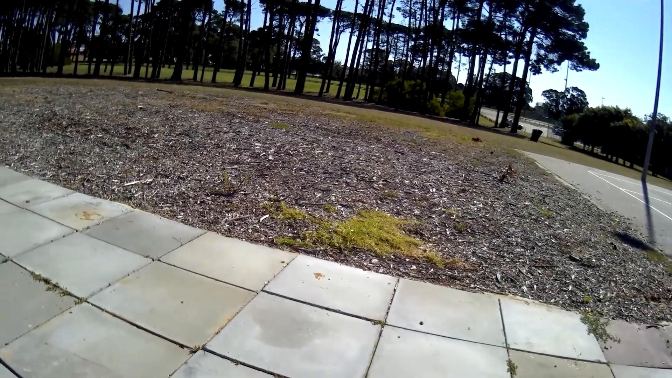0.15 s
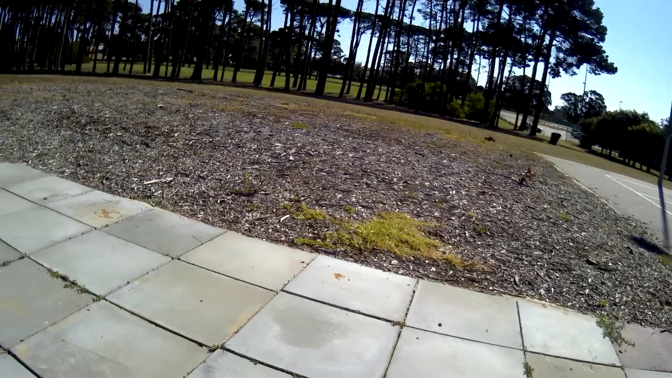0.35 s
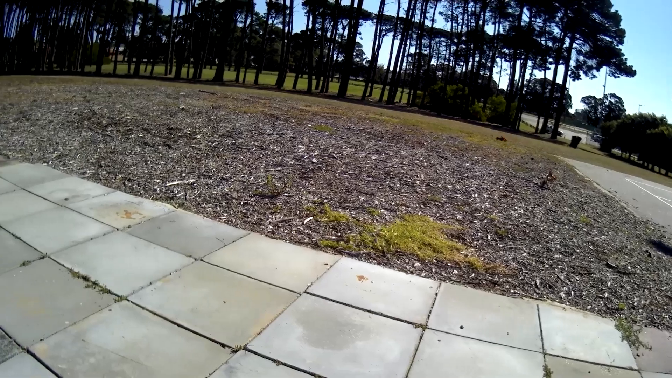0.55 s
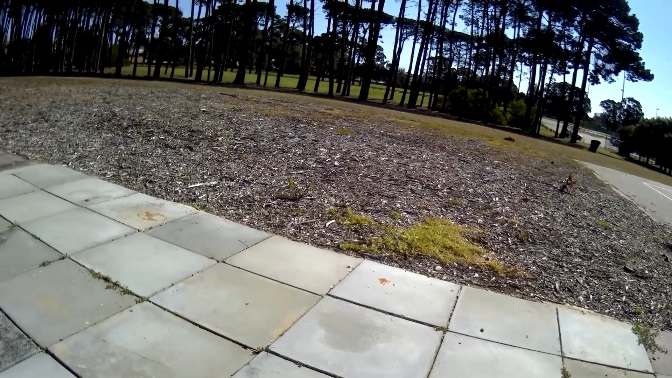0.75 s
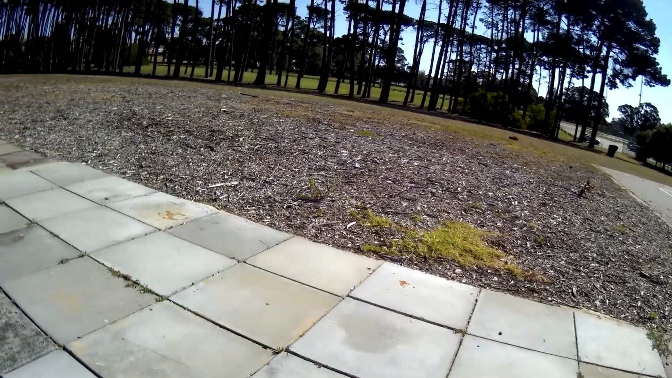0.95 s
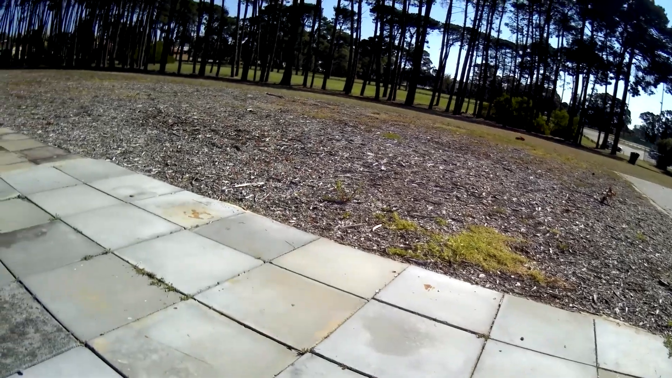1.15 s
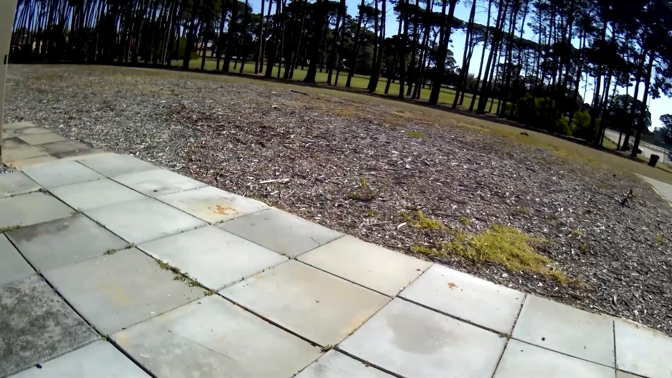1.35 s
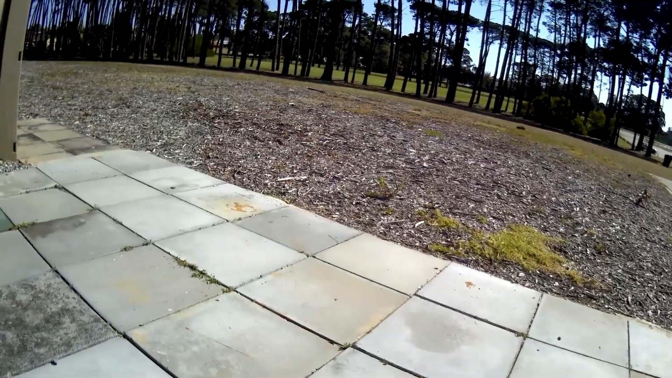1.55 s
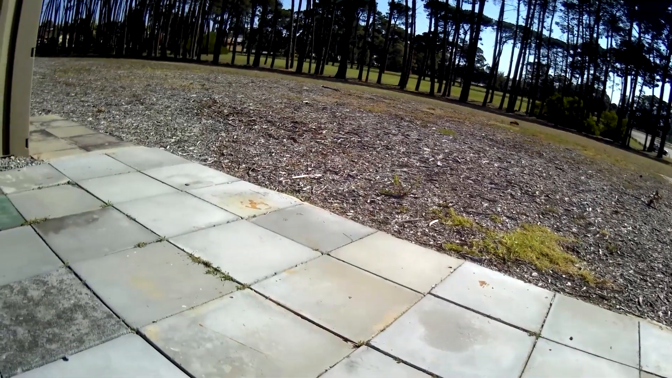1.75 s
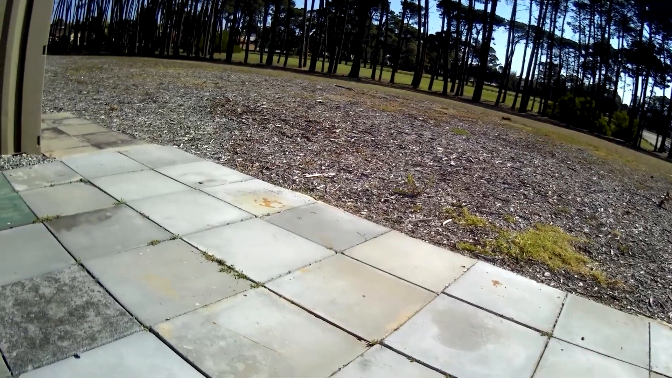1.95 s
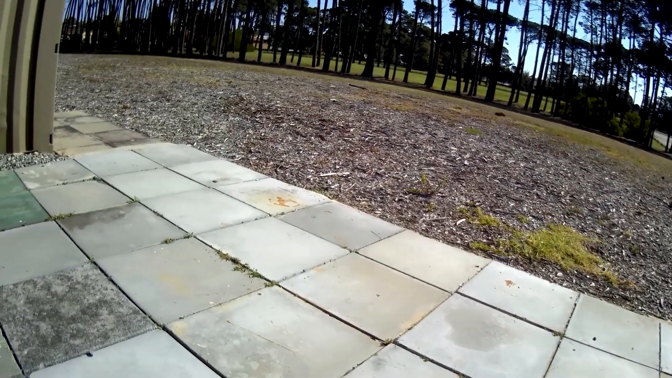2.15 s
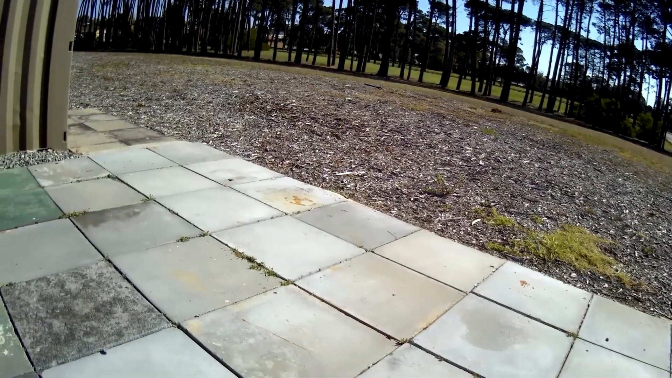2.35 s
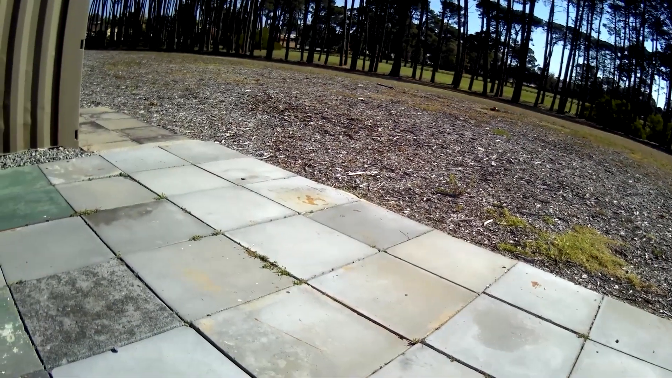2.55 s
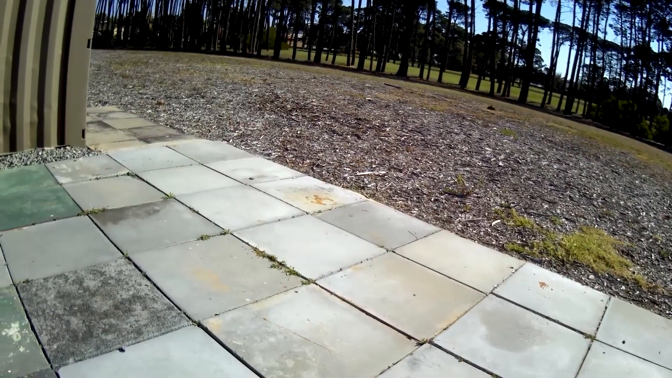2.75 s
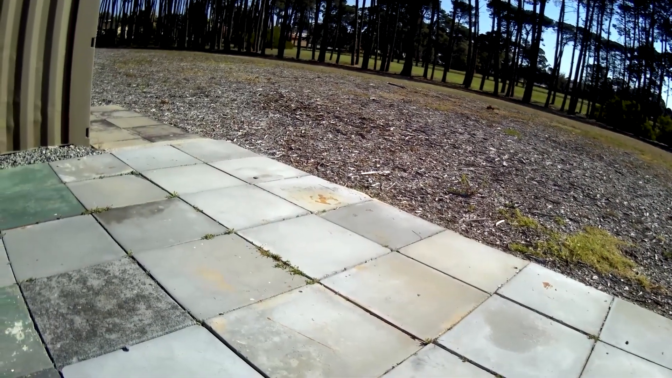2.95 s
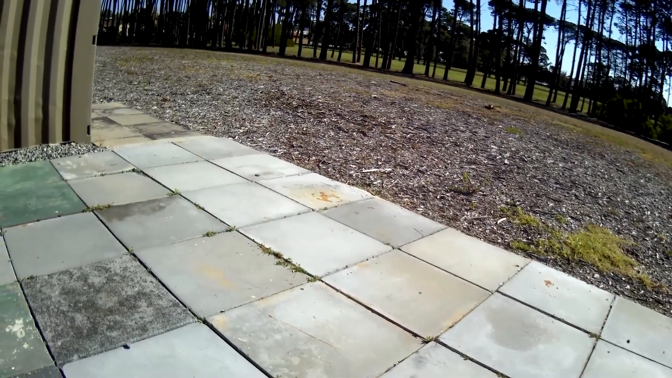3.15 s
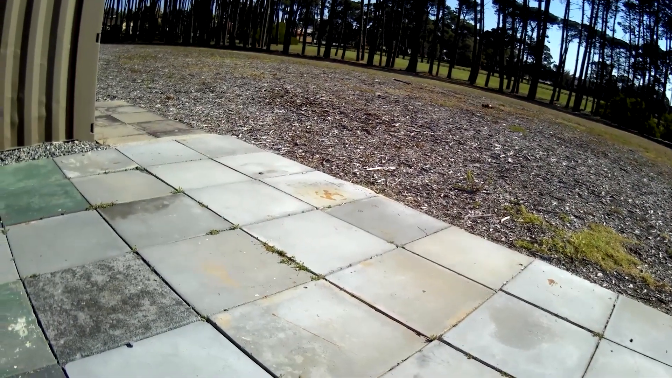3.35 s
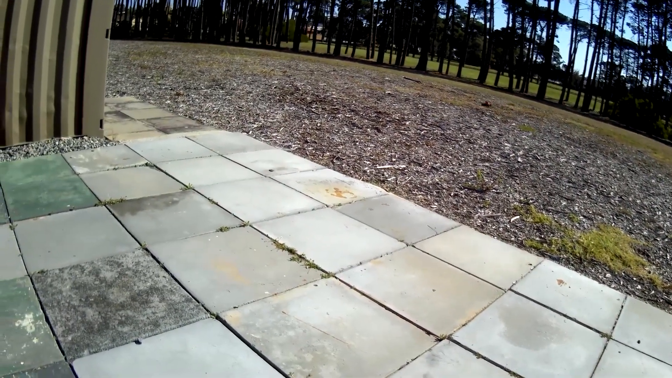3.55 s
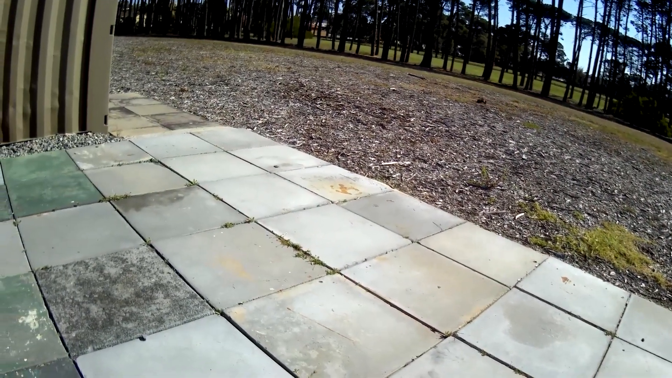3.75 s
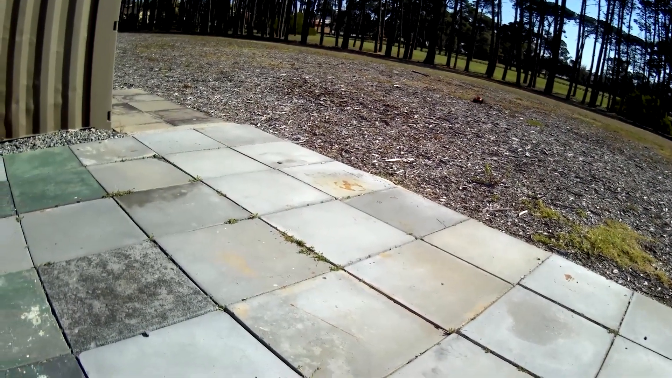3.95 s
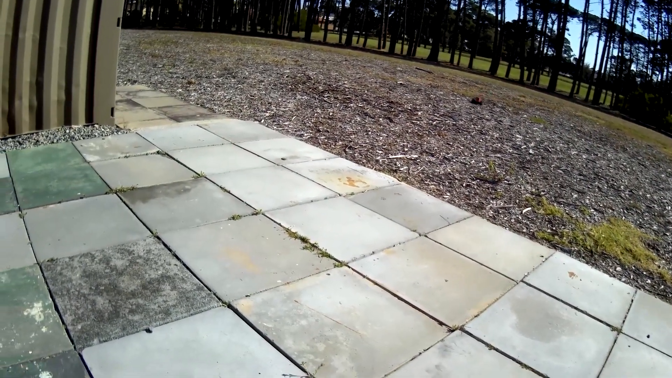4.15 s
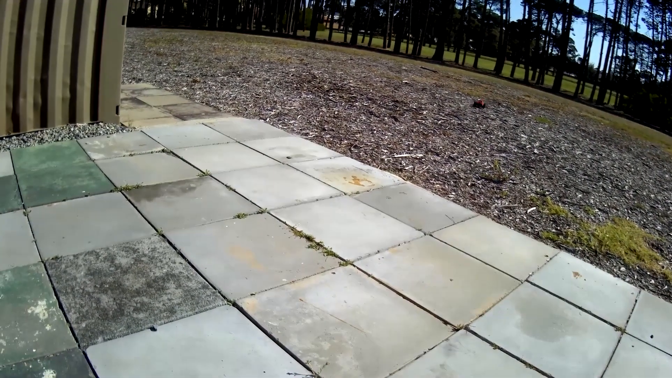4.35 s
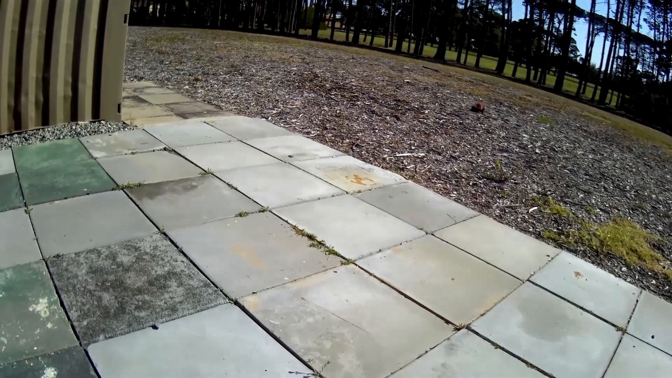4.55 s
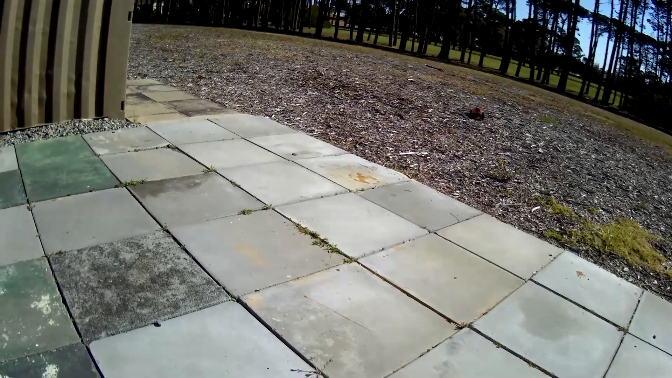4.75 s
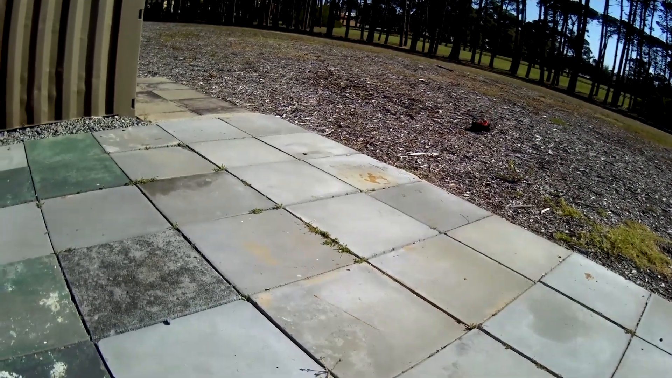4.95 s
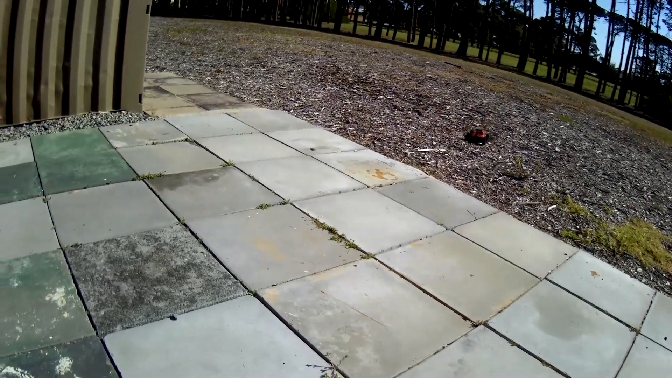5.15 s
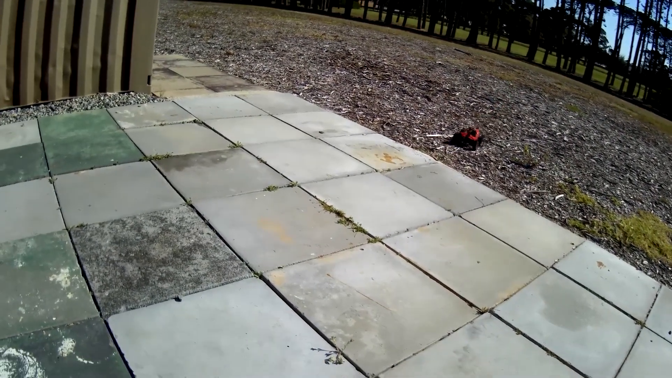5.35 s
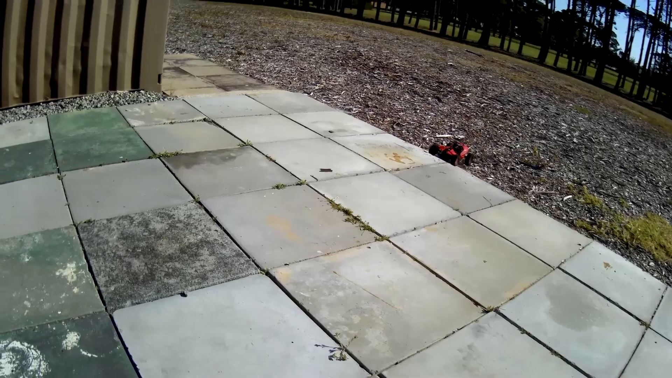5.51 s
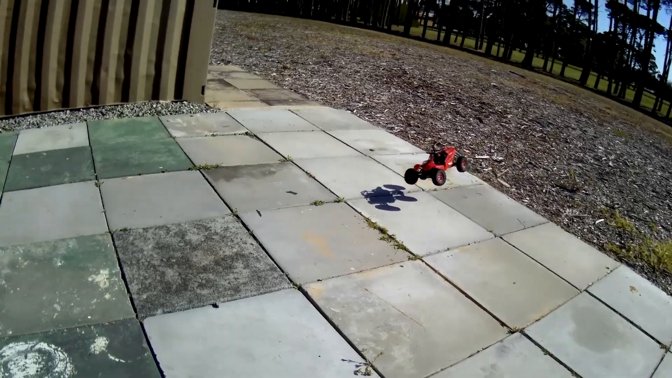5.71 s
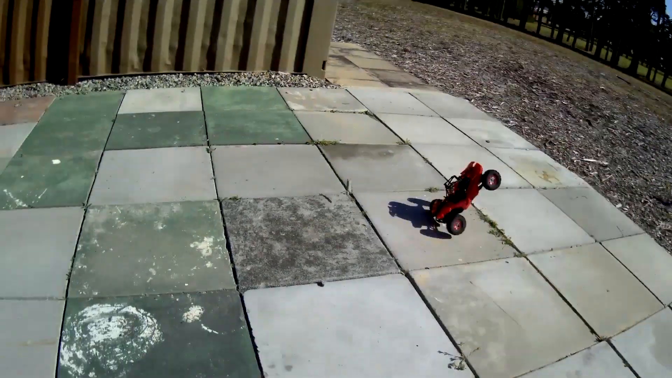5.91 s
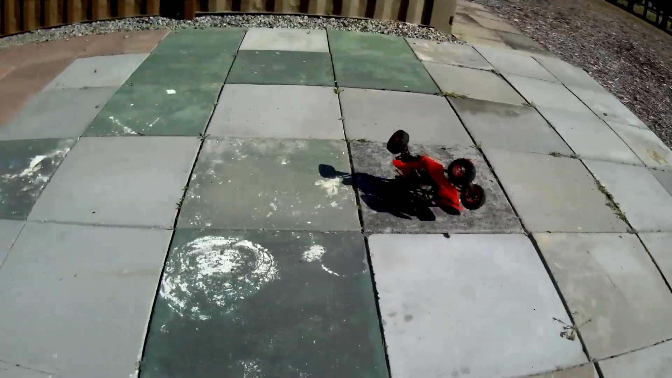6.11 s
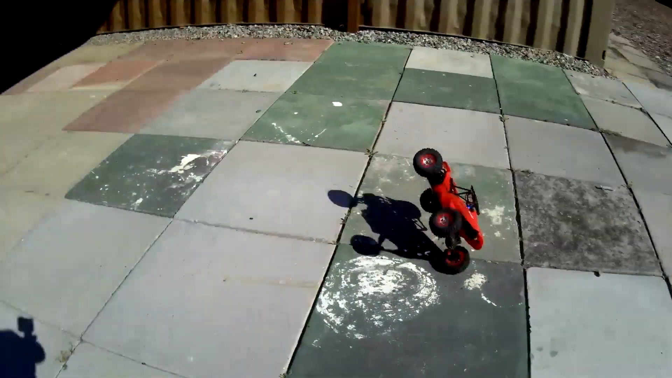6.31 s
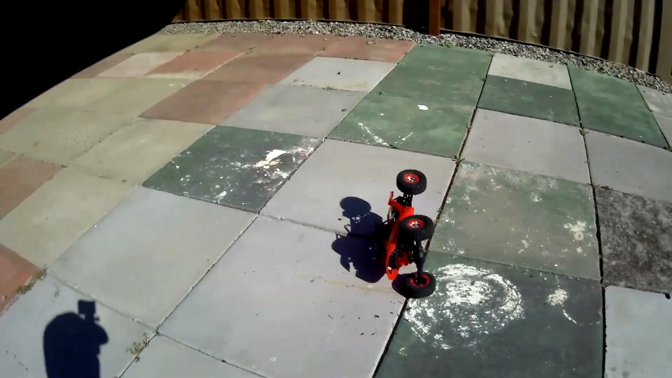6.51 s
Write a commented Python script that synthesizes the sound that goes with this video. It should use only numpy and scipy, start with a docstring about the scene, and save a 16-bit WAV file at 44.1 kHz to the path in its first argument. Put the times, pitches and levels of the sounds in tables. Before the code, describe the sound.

Outdoors, low wind rumbles on the microphone throughout, over a soft hiss of trees and road and a distant engine drone that slowly rises. From about 0.3 seconds, a small remote-control truck's electric motor gives short, faint bursts of high, raspy whine. At about 3.3 seconds it holds full throttle, wavering and growing louder as it approaches, with plastic gears chattering. From around 4 seconds its tyres crunch over wood chips, with a few small knocks. At 5.5 seconds it hits paving slabs with clacks, scuffs and tiny squeaks. Near 5.9 seconds it brakes, the whine falling quickly, and the loudest cluster of sharp plastic knocks comes close by at about 6.1 seconds. The truck tumbles on with rattles, gritty scrapes and lighter thuds until about 6.7 seconds. The whole sound is narrow and dull, with little treble.

```python
"""A raspy whine comes in bursts, then runs on and nears: a small radio-controlled truck races over wood
chips, hops onto paving, lands, brakes and tumbles. Meshing gear teeth make the whine and ring the gearbox;
the tyres crunch in countless tiny impacts, and blows on the slabs excite the modes of the plastic shell.
Behind it wind rumbles on the microphone, trees and a road hiss, and an engine drones far away.
The camera's low sampling rate makes everything narrow and dull."""
import sys
import numpy as np
from scipy import signal
from scipy.fft import rfft, irfft, next_fast_len
from scipy.io import wavfile

SR = 44100
rng = np.random.default_rng(int(sys.argv[2]) if len(sys.argv) > 2 else 0)


def wrap_up_sound(samples):
    """Save the sound to the file named by the first command line argument, as 16-bit audio."""
    columns = np.atleast_2d(samples).T
    # keep every value between -1 and 1, then stretch to whole-number steps
    tamed = np.clip(columns, -1, 1)
    steps = np.round(tamed * 32767).astype(np.int16)
    wavfile.write(sys.argv[1], SR, steps)


N = 294271
TIME = np.arange(N) / SR
TICKS = np.arange(0, N / SR, .001)  # control times, one per millisecond


def motor():
    """Gear-mesh noise: a tone at the tooth rate in a band of chatter, modulated as the wheels skip."""
    # band that the motor can radiates: frequency_hz, gain_db
    can_response = [(2700, -15.5), (2950, 2.5), (3200, -3), (3450, -7.5), (3720, 0), (3950, -11.5)]
    teeth_per_turn, skip_hz = 48, 47.4
    mesh_hz, gain = throttle()
    skip = np.clip(wander(skip_hz), -1, 2)  # an unloaded wheel raises both pitch and level
    hz = mesh_hz * (1 + 0.018 * skip)
    tone = whine(hz, jitter=.016, jitter_hz=170, flutter_db=2)
    rasp = grit(per_s=380, spread_db=0.5, hiss=0.36)
    for _ in range(3):  # cascaded for steep skirts
        rasp = moving_resonance(rasp, hz, width_hz=750)
    buzz = unit(rasp) + 1.05 * tone
    shaft_turns = np.cumsum(hz * (1 + 0.13 * wander(30))) / SR / teeth_per_turn
    throb = (1 + 0.2 * np.sin(2 * np.pi * shaft_turns)) * amp(2.5 * skip)
    return amp(1.5) * gain * unit(colour(throb * buzz, can_response))


def throttle():
    """Mesh pitch and gain follow drive and load: each squeeze spins the motor up; deep chips slow it."""
    # short squeezes of the throttle: start_s, end_s, top_pitch_hz, level_db
    squeezes = [(0.297, 0.485, 4020, -25), (0.562, 0.67, 3930, -32), (1.082, 1.3, 3010, -35),
                (1.281, 1.598, 3330, -36.5), (1.703, 1.796, 3130, -34), (1.896, 2.004, 3166, -30.5),
                (2.098, 2.234, 3076, -34), (2.423, 2.535, 3214, -30.5), (2.582, 2.877, 3415, -33),
                (3.071, 3.128, 2900, -32), (3.148, 3.237, 3250, -38), (3.256, 3.332, 3210, -31.5),
                (5.702, 5.776, 3537, -36.5), (5.889, 6.102, 3510, -35.5)]
    # long run at full throttle: time_s, pitch_hz, level_db
    full_run = [(3.33, 3126, -29.5), (3.38, 3330, -23.5), (3.44, 3217, -26), (3.52, 3490, -21.5),
                (3.58, 3356, -22.5), (3.71, 3394, -26.5), (3.78, 3376, -24.5), (3.86, 3425, -28.5),
                (3.98, 3405, -25.5), (4.07, 3520, -24), (4.12, 3382, -22.5), (4.201, 3436, -31),
                (4.309, 3396, -23.5), (4.38, 3477, -25.5), (4.449, 3499, -24), (4.53, 3534, -31.5),
                (4.611, 3540, -26.5), (4.712, 3443, -23.5), (4.92, 3595, -27), (5.009, 3162, -24),
                (5.06, 3463, -26.5), (5.15, 3573, -22), (5.2, 3377, -24.5), (5.301, 3505, -22),
                (5.44, 3526, -26), (5.48, 3298, -28), (5.57, 3324, -25.5), (5.61, 3550, -37),
                (5.67, 3536, -26.5)]
    attack_s, release_s = 0.027, .025
    sag, spin_up_s = 0.047, 0.25  # the pitch starts low by this share and catches up
    hz, gain = np.full(len(TICKS), float(squeezes[0][2])), 0
    for start_s, end_s, top_hz, db in squeezes:
        on = TICKS >= start_s
        hz[on] = top_hz * (1 - sag * np.exp((start_s - TICKS[on]) / spin_up_s))
        gain = np.maximum(gain, amp(db) * envelope(start_s, end_s, attack_s, release_s))
    run_s, run_hz, run_db = np.transpose(full_run)
    run_gain = amp(np.interp(TICKS, run_s, run_db)) * envelope(run_s[0], run_s[-1], attack_s, release_s)
    hz = np.where(run_gain > gain, np.interp(TICKS, run_s, run_hz), hz)
    return per_sample(hz), per_sample(np.maximum(gain, run_gain) * nearness())


def braking():
    """Mesh pitch is proportional to speed: the tone falls ever faster, loudest as the truck lands."""
    start_s, peak_s, end_s = 5.86, 6.105, 6.25
    from_hz, to_hz, fade_db_per_s = 2300, 694, 51
    progress = np.clip((TIME - start_s) / (end_s - start_s), 0, 1)
    hz = from_hz + (to_hz - from_hz) * progress ** 1.8
    gain = amp(-27.5 - fade_db_per_s * abs(TICKS - peak_s))
    gain *= envelope(start_s, end_s, attack_s=0.018, release_s=0.0055)
    return per_sample(gain) * whine(hz, jitter=.075, jitter_hz=300, flutter_db=4)


def gears(rattle):
    """Forced resonance: teeth ring the plastic gearbox under drive and at jolts; mesh tones sing through."""
    # spectrum of the tooth chatter: frequency_hz, gain_db
    chatter_spectrum = [(300, -22.5), (700, -6), (1100, -4.5), (1350, -1), (1600, 1.5), (1850, -2.5),
                        (2300, -7), (2750, -14.5), (3300, -25.5), (3900, -49.5)]
    # gearbox resonances: pitch_hz, width_hz, gain_db
    housing_modes = [(820, 28, -14.5), (990, 17, -9), (1410, 90, -1), (1486, 130, 6.5), (1660, 83, -1.5),
                     (2090, 130, -11.5)]
    # mesh tones of the slower stages, relative to the chatter: pitch_hz, level_db
    stage_tones = [(1285, -15), (1565, -13.5), (1725, -16)]
    teeth = grit(per_s=2500, spread_db=4.0, hiss=.8)
    ring = sum(amp(db) * resonance(teeth, hz, width_hz) for hz, width_hz, db in housing_modes)
    chatter = unit(unit(colour(teeth, chatter_spectrum)) + 0.14 * unit(ring)) * amp(1.3 * wander(30))
    tones = np.zeros(N)
    for hz, db in stage_tones:
        gain = amp(db + 1.4 * wander(4.5))
        drifting_hz = hz * (1 + 0.01 * wander(3.2))
        tones += gain * whine(drifting_hz, jitter=.007, jitter_hz=59.3, flutter_db=3.0)
    driven = amp(-24.5) * envelope(start_s=3.21, end_s=5.96, attack_s=0.25, release_s=0.25)
    coasting = amp(-42.5)
    running = per_sample(nearness() * np.maximum(driven, coasting))
    return np.hypot(running, rattle) * chatter + running * tones


def knocks():
    """Impact excitation: plastic cracks on stone, the shell's modes ring and the suspension thuds."""
    # blows of wheels and shell: start_s, peak_db, thud_weight_db
    blows = [(0.5434, -29, 4), (4.825, -29, -8), (5.202, -24, 7), (5.503, -21, -5), (5.549, -17, -5),
             (5.607, -23, -3), (5.628, -26, 11), (5.88, -22, 2), (5.903, -20.5, 0), (5.939, -17.5, -16.5),
             (5.952, -31, -6.5), (6.063, -11, -15), (6.067, -8, 0.5), (6.071, -8.5, 9), (6.089, -16, -15),
             (6.1, -16, -7), (6.133, -16, -12), (6.145, -16.5, -14), (6.185, -14.5, -14), (6.196, -16, -5),
             (6.210, -15.5, -0.5), (6.228, -22, -5.5), (6.233, -25, -3), (6.289, -19, 14), (6.3, -19, 2),
             (6.343, -28, -6), (6.355, -31, -7), (6.472, -20, 6), (6.497, -21.5, 21), (6.564, -27.5, -5),
             (6.635, -25, 0), (6.6407, -19.5, -2)]
    # shell modes, raised by up to 5 % at each blow: pitch_hz, level_db, t60_s
    shell_modes = [(466, -19.5, 0.041), (726, -3.5, 0.019), (940, 3, 0.035), (1417, 3.5, 0.019),
                   (1563, 4, 0.021), (1732, 0.5, 0.031), (1900, -11, 0.026), (2510, -8.5, 0.011)]
    crack_t60_s, thud_t60_s, thud_hz = 0.014, 0.022, 288
    out, t = np.zeros(N), np.arange(SR // 6) / SR
    onset = 1 - np.exp(-t / .0003)  # the tyres soften each blow
    for start_s, peak_db, thud_db in blows:
        ring = np.zeros(len(t))
        for hz, db, t60_s in shell_modes:
            cycles = hz * rng.uniform(1.0, 1.05) * t + rng.random()
            ring += amp(db - 60 * t / t60_s) * np.sin(2 * np.pi * cycles)
        burst = unit(resonance(rng.standard_normal(len(t)), hz=1880, width_hz=640))
        crack = amp(-17 - 60 * t / crack_t60_s) * burst
        thud = amp(-60 * t / thud_t60_s) * np.sin(2 * np.pi * thud_hz * rng.uniform(0.84, 1.35) * t)
        blow = (ring / abs(ring).max() + crack + amp(thud_db - 6.5) * thud) * onset
        add(out, start_s, amp(peak_db) * blow / abs(blow).max())
    return out


def wood_chips():
    """Granular noise: tiny impacts under the tyres merge into a crunch that swells at each heap."""
    # spectrum of the crunch: frequency_hz, gain_db
    chip_spectrum = [(60, -15.5), (150, -0.5), (300, -2.5), (420, -4), (600, -11.5), (1000, -16),
                     (1600, -13.5), (3000, -25.5)]
    # heaps that the tyres plough into: peak_s, level_db
    heaps = [(4.105, -45.5), (4.244, -42), (4.382, -41.5), (4.572, -41), (4.818, -43), (4.994, -33.5),
             (5.108, -36), (5.27, -42.5), (5.345, -40), (5.41, -33), (5.48, -32.5)]
    rolling = nearness() * envelope(start_s=3.64, end_s=5.55, attack_s=1, release_s=0.047)
    lumps = amp(-22.5 + 0.5 * wander(14))
    ploughing = sum(amp(db) * swell(s, attack_s=0.026, release_s=0.019) for s, db in heaps)
    crunch = unit(colour(grit(per_s=350, spread_db=4.5, hiss=0.99), chip_spectrum))
    return np.hypot(per_sample(rolling) * lumps, per_sample(ploughing)) * crunch


def paving(scuffing, scraping):
    """Sliding friction: rubber scuffs low on the slabs and sand scrapes high."""
    # spectrum of rubber on stone: frequency_hz, gain_db
    rubber_spectrum = [(100, 2.5), (280, -5), (450, 0.5), (620, 1.5), (900, 3), (1200, 0), (2000, -15.5),
                       (2600, -25.5), (3900, -11.5)]
    # spectrum of sand on stone: frequency_hz, gain_db
    sand_spectrum = [(800, -17.5), (2000, -6.5), (2600, 7), (3100, 7.5), (3900, 8)]
    scuff = unit(colour(grit(per_s=1100, spread_db=4.5, hiss=0.42), rubber_spectrum))
    scrape = unit(colour(grit(per_s=670, spread_db=-2.5, hiss=0.16), sand_spectrum))
    return scuffing * scuff + scraping * scrape


def contacts():
    """Incoherent sounds add in power: the gains of scuff, scrape and gear rattle over all touchdowns."""
    # wheels and shell meeting the slabs: peak_s, release_s, scuff_db, scrape_db, rattle_db
    touchdowns = [(5.48, 0.047, -37, -50.5, -34), (5.546, 0.034, -28, -48, -36),
                  (5.607, 0.014, -23.5, -20.5, -36), (5.689, 0.044, -63, -26.5, -60),
                  (5.912, .03, -29.5, -22, -37), (5.949, 0.022, -21.5, -17, -30.5),
                  (6.001, 0.028, -31, -40, -29), (6.035, .02, -36, -30, -39),
                  (6.066, 0.018, -21.5, -25, -36.5), (6.098, 0.018, -38, -17, -20.5),
                  (6.141, 0.017, -34, -36, -20.5), (6.185, 0.013, -35, -47, -25),
                  (6.211, 0.027, -23, -28, -24), (6.292, 0.047, -44, -64, -34.5),
                  (6.492, 0.14, -39, -56, -39.5), (6.64, 0.15, -31, -41, -34)]
    power = sum((amp(levels_db)[:, None] * swell(s, attack_s=0.016, release_s=release_s)) ** 2
                for s, release_s, *levels_db in touchdowns)
    return [per_sample(gain) for gain in np.sqrt(power)]


def chirps():
    """Short tones under bell-shaped envelopes: the whine flicks upward as the wheels skip, gears and rubber
    squeak, and the shell rings at the hardest blow."""
    # short tones: peak_s, pitch_hz, peak_db, half_length_s, glide_hz_per_s
    chirp_rows = [(0.617, 3680, -53.5, 0.0061, 2), (3.778, 3410, -47, 0.016, -1), (3.82, 3610, -45, 0.0046, 0),
                  (3.942, 3610, -45, 0.004, -6), (4.222, 3730, -50, 0.014, 0), (4.243, 3600, -47, 0.0031, 4),
                  (4.307, 3420, -44.5, 0.03, 0), (4.445, 3562, -41, 0.0068, 0), (4.486, 3614, -36, 0.0037, 0),
                  (4.557, 3750, -39, 0.0032, 1), (4.603, 3580, -40, 0.0048, 0), (4.697, 3464, -36.5, 0.008, 3),
                  (5.046, 3574, -33, 0.004, -5), (5.384, 1308, -34, 0.022, 0), (5.544, 1599, -30.5, 0.033, -700),
                  (5.55, 3290, -24.5, 0.006, 1), (5.641, 3590, -20.5, 0.0037, -0.5),
                  (5.908, 3820, -27.5, 0.0046, 0), (6.041, 1870, -15.5, 0.0038, 2),
                  (6.041, 3780, -25.5, 0.0034, 1), (6.0882, 1597, -4, 0.003, 1.5), (6.15, 1430, -21, 0.0052, 1),
                  (6.212, 838, -19.5, .005, 3)]
    out, t = np.zeros(N), np.arange(-SR // 4, SR // 4) / SR
    for peak_s, hz, db, half_length_s, glide in chirp_rows:
        tone = np.sin(2 * np.pi * (hz + glide * t / 2) * t)
        add(out, peak_s + t[0], amp(db) * np.exp(-(t / half_length_s) ** 2) * tone)
    return out


def nearness():
    """Spreading loss low over the ground: gain, relative to 1 m, of a steady approach that ends close by."""
    speed_m_per_s, arrival_s, nearest_m, loss_db_per_doubling = 5.28, 5.952, 1.85, 8
    distance_m = np.hypot(nearest_m, speed_m_per_s * np.maximum(arrival_s - TICKS, 0))
    return amp(-loss_db_per_doubling * np.log2(distance_m))


def wind():
    """Turbulent pressure on the microphone: a low rumble with gusts and single buffets."""
    # strength of the wind: time_s, level_db
    strength = [(0.0, -34.5), (0.8, -34), (1.35, -38), (1.82, -35), (3.0, -37), (3.84, -38.5),
                (4.27, -33.5), (5.07, -31.5), (5.33, -27), (5.54, -23), (5.7, -41.5), (5.78, -27.5),
                (6.06, -25), (6.67, -32.5)]
    # single buffets: peak_s, level_db
    buffets = [(0.449, -32.5), (2.6, -30.5), (4.21, -25), (4.36, -30.5), (4.7, -25.5), (5.281, -20.5),
               (5.93, -20)]
    # spectrum of the rumble: frequency_hz, gain_db
    rumble_spectrum = [(10, -9), (25, 1.5), (50, 2), (75, -4.5), (110, -7.5), (170, -19), (280, -32),
                       (600, -64)]
    buffeting = sum(amp(db) * swell(s, attack_s=0.031, release_s=0.054) for s, db in buffets)
    gusts = amp(track(strength) - 0.3 + 0.5 * wander(4.1))
    rumble = unit(colour(rng.standard_normal(N), rumble_spectrum))
    return np.hypot(gusts, per_sample(buffeting)) * rumble


def trees_and_road():
    """Many distant, incoherent sources merge into a nearly steady wash of noise."""
    # spectrum of the wash: frequency_hz, gain_db
    wash_spectrum = [(100, -11), (220, 3.5), (320, -2.5), (500, 1), (700, -0.5), (900, 0.5), (1200, -4),
                     (1600, -4.5), (2000, -12), (2400, -16.5), (3000, -19.5), (3900, -23)]
    return amp(-46.5) * unit(colour(rng.standard_normal(N), wash_spectrum)) * amp(0.5 * wander(4.1))


def far_engine():
    """Periodic firing gives a harmonic drone, which rises as the engine slowly gains speed."""
    # course of the engine: time_s, firing_hz, fundamental_db, overtones_db
    course = [(0, 54, -52, -48.5), (.5, 57, -44.5, -44.5), (1.3, 60.5, -45.5, -46), (2.1, 64, -35.5, -45.5),
              (2.6, 68.5, -37.5, -42.5), (3.1, 74.5, -42.5, -43.5), (3.5, 71.5, -46.5, -48),
              (4.5, 75, -46, -48.5), (5.4, 68.5, -43, -42.5), (6.0, 70, -36.5, -42),
              (6.67, 72.5, -32.5, -43)]
    # overtones: multiple, relative_level_db
    orders = [(2, 1.5), (3, -10)]
    cycles = np.cumsum(track(course) * (1 + 0.03 * wander(22))) / SR
    fundamental = amp(2.5 * wander(6)) * np.sin(2 * np.pi * cycles)
    overtones = sum(amp(db + 3.3 * wander(14)) * np.sin(2 * np.pi * k * cycles) for k, db in orders)
    return amp(track(course, column=2)) * unit(fundamental) + amp(track(course, column=3)) * unit(overtones)


def whine(hz, jitter, jitter_hz, flutter_db):
    """A tooth-mesh tone, modulated in frequency and amplitude by the bouncing wheels."""
    cycles = np.cumsum(hz * (1 + jitter * wander(jitter_hz))) / SR
    return unit(np.sin(2 * np.pi * cycles) * amp(flutter_db * wander(35)))


def grit(per_s, spread_db, hiss):
    """Shot noise: random impacts of uneven size over a share of even hiss."""
    size = amp(spread_db * np.minimum(rng.exponential(1, N), 3))
    clicks = size * rng.choice([-1, 1], N) * (rng.random(N) < per_s / SR)
    return unit(clicks) + hiss * rng.standard_normal(N)


def wander(hz):
    """Random modulation of rms 1, with a bandwidth of about hz."""
    knots = rng.standard_normal(N // 64)
    return unit(np.interp(TIME * 2 * hz, np.arange(len(knots)), knots))


def resonance(x, hz, width_hz):
    """A damped resonator with a gain of about 1 at hz."""
    radius = np.exp(-np.pi * width_hz / SR)
    pole_real = radius * np.cos(2 * np.pi * hz / SR)
    return 2 * (1 - radius) * signal.lfilter([1, -pole_real], [1, -2 * pole_real, radius ** 2], x)


def moving_resonance(x, hz, width_hz):
    """Heterodyne filter: shifts the curve hz down to zero, low-passes and shifts back."""
    carrier = np.exp(2j * np.pi * np.cumsum(hz) / SR)
    radius = np.exp(-np.pi * width_hz / SR)
    return 2 * (carrier * signal.lfilter([1 - radius], [1, -radius], x / carrier)).real


def colour(x, spectrum):
    """Spectral shaping by rows of frequency_hz, gain_db."""
    hz, db = np.transpose(spectrum)
    size = next_fast_len(N + 4096, real=True)
    bins_hz = np.fft.rfftfreq(size, 1 / SR)
    gain = amp(np.interp(np.log(bins_hz + 1), np.log(hz + 1), db))
    return irfft(rfft(x, size) * gain, size)[:N]


def envelope(start_s, end_s, attack_s, release_s):
    """Linear rise from start_s, then exponential decay from end_s."""
    rise = np.clip((TICKS - start_s) / attack_s, 0, 1)
    return rise * np.exp(-(np.maximum(TICKS - end_s, 0) / release_s).clip(max=40))


def swell(peak_s, attack_s, release_s):
    """Exponential growth up to peak_s, then exponential decay."""
    return np.exp(-np.maximum((peak_s - TICKS) / attack_s, (TICKS - peak_s) / release_s).clip(max=40))


def track(rows, column=1):
    """One column of a timed table, interpolated at every sample."""
    rows = np.asarray(rows)
    return np.interp(TIME, rows[:, 0], rows[:, column])


def per_sample(control):
    """A millisecond control, interpolated at every sample."""
    return np.interp(TIME, TICKS, control)


def add(mix, start_s, sound):
    """Superposes a sound on the mix."""
    part = mix[max(round(start_s * SR), 0):][:len(sound)]
    part += sound[:len(part)]


def amp(db):
    """Decibels to amplitude gain."""
    return 10 ** (np.asarray(db) / 20)


def unit(x):
    """Scales to rms 1."""
    return x / np.sqrt(np.mean(x ** 2) + 1e-20)


def scene():
    """Superposition in open air: the truck, its faint reflection off a nearby fence, and the background."""
    scuffing, scraping, rattle = contacts()
    drivetrain = motor() + braking() + gears(rattle)
    truck = drivetrain + chirps() + wood_chips() + paving(scuffing, scraping) + knocks()
    out = truck + wind() + trees_and_road() + far_engine()
    add(out, start_s=.021, sound=amp(-15.5) * truck)  # fence echo
    return out[None]


def record(dry):
    """Sampling: the camera keeps the band under half its low rate and mirrors a faint image upward."""
    # treble response of the camera: frequency_hz, gain_db
    camera_response = [(3000, -0.5), (3700, -4.5), (4300, -9), (4550, -12.5), (5000, -17.5), (5500, -31),
                       (5850, -43.5), (6100, -64.5), (8000, -69.5), (9800, -74.5)]
    sampling_hz, edge_hz, fade_s = 8000, 9900, .003
    band = signal.oaconvolve(dry[0], signal.firwin(401, sampling_hz / 2, fs=SR), "same")
    band *= np.clip(np.minimum(TIME, TIME[::-1]) / fade_s, 0, 1)
    image = band * 2 * np.cos(2 * np.pi * sampling_hz * TIME)
    dulled = colour(band + image, camera_response)
    edge_filter = signal.firwin(401, edge_hz, window=("kaiser", 8), fs=SR)
    return signal.oaconvolve(dulled, edge_filter, "same")[None]


dry = scene()
out = record(dry)
wrap_up_sound(out)
```